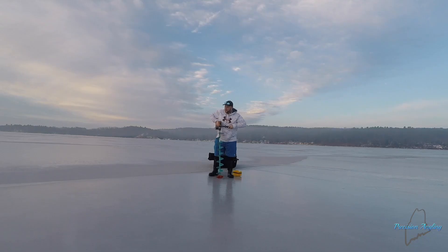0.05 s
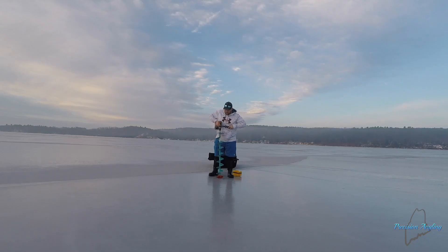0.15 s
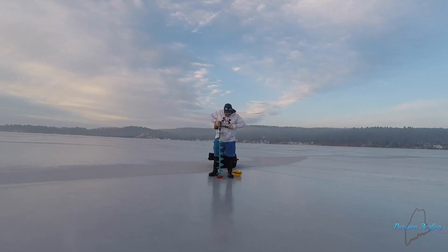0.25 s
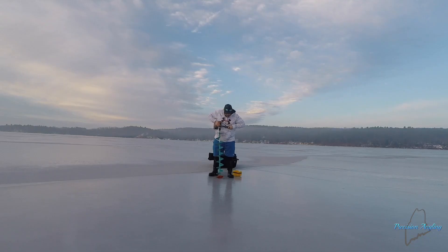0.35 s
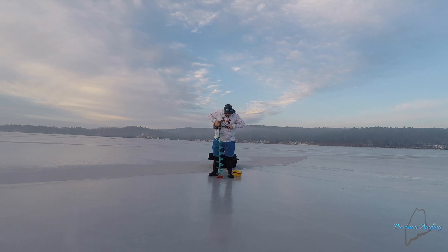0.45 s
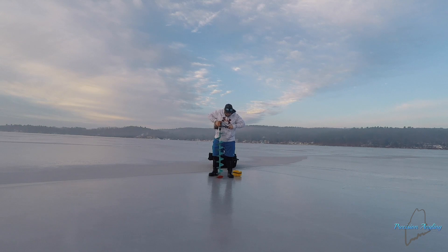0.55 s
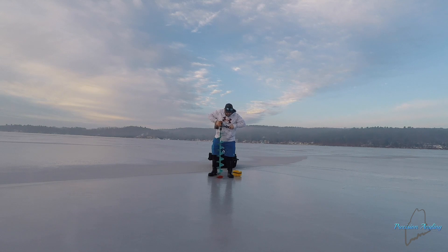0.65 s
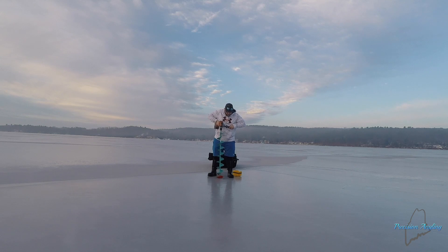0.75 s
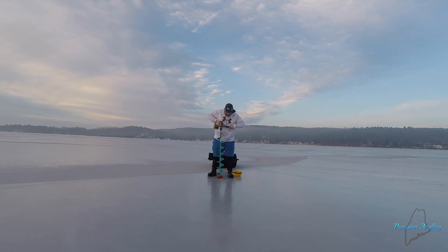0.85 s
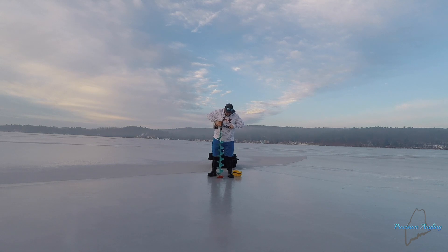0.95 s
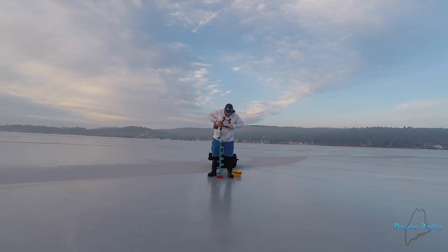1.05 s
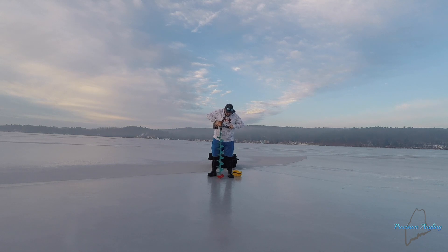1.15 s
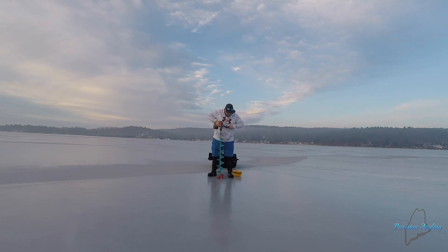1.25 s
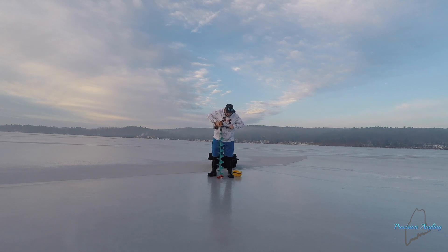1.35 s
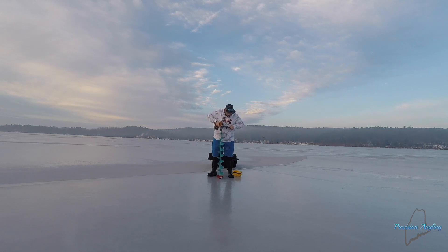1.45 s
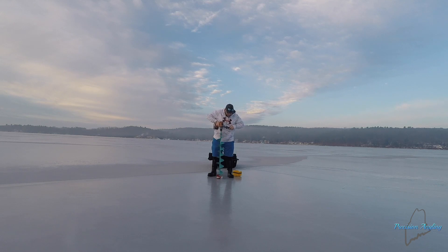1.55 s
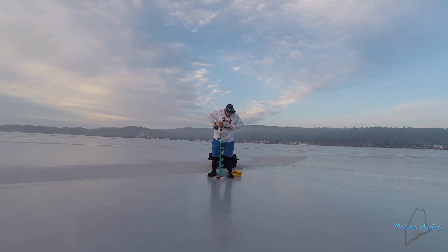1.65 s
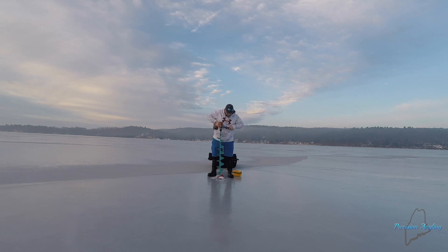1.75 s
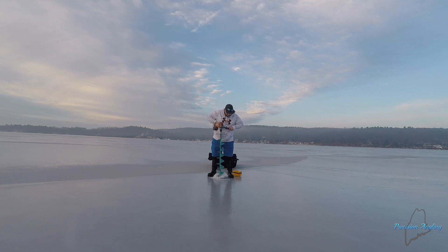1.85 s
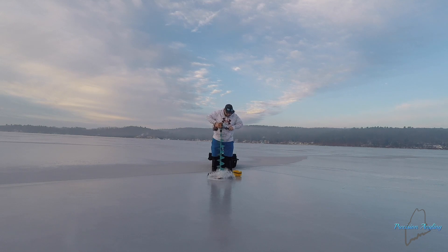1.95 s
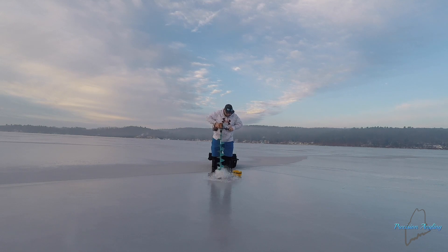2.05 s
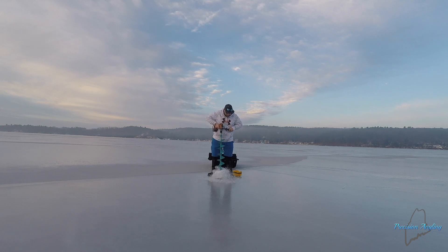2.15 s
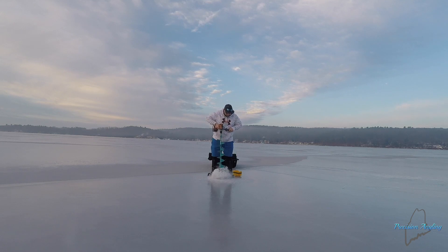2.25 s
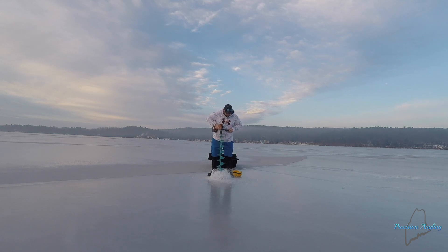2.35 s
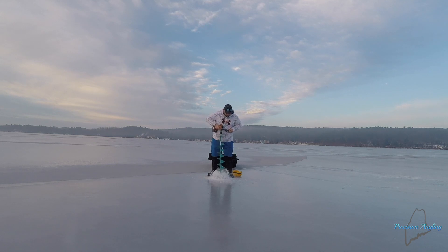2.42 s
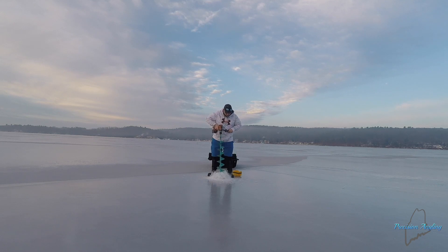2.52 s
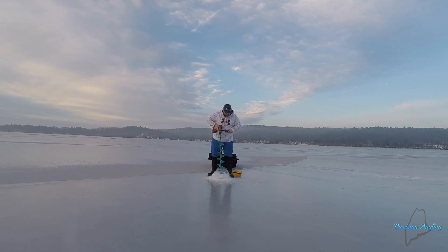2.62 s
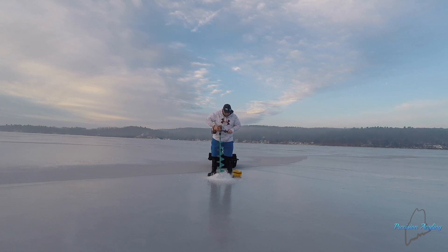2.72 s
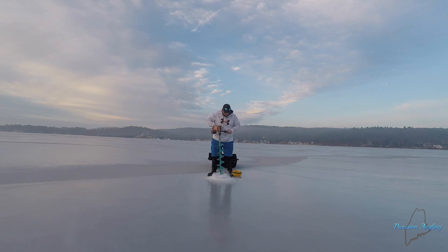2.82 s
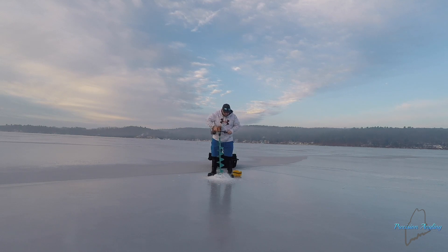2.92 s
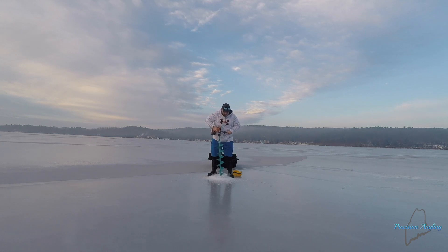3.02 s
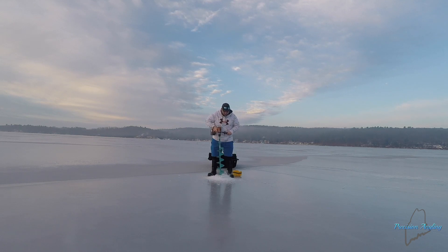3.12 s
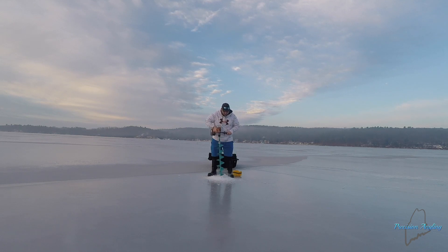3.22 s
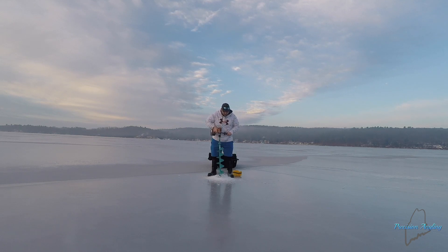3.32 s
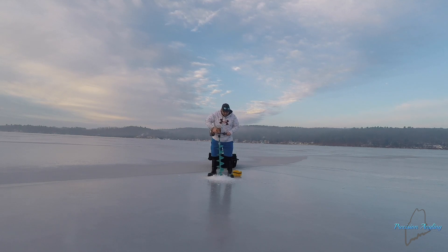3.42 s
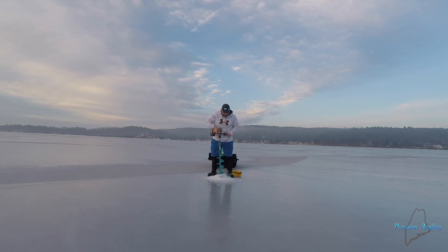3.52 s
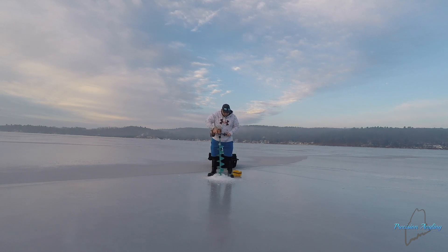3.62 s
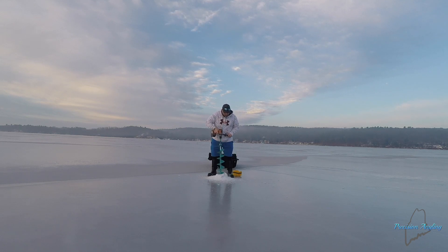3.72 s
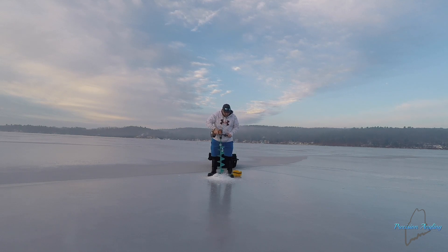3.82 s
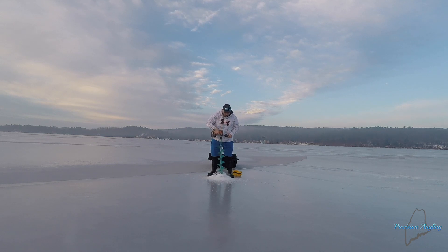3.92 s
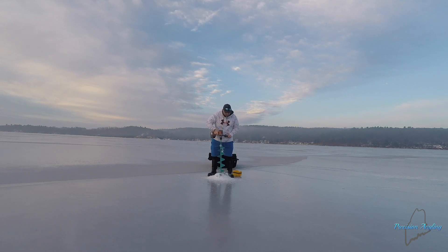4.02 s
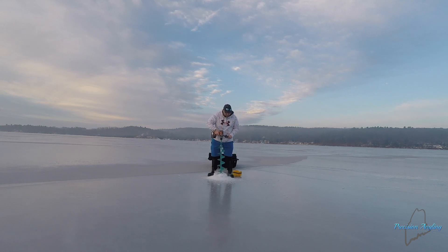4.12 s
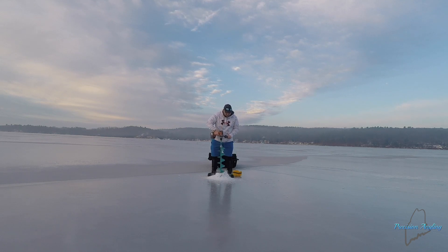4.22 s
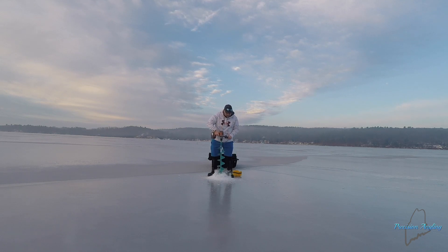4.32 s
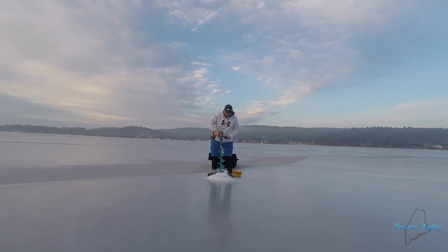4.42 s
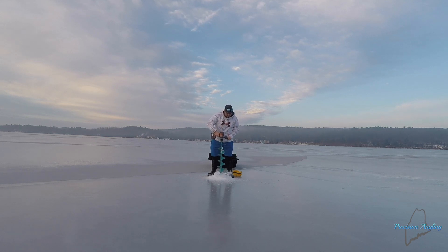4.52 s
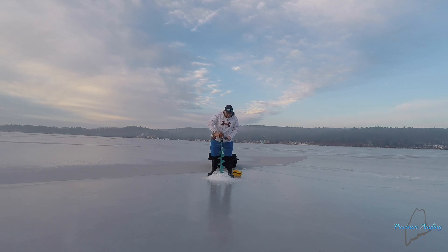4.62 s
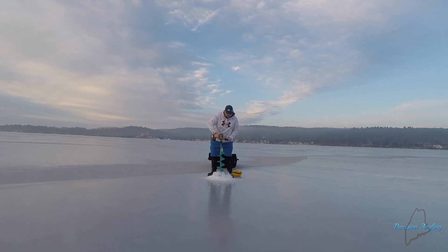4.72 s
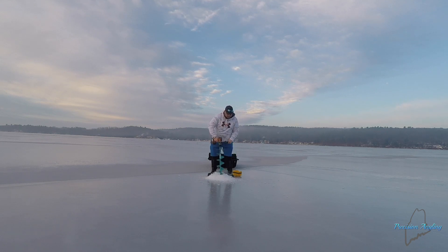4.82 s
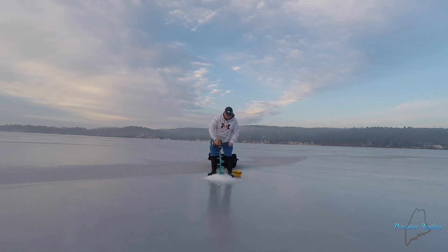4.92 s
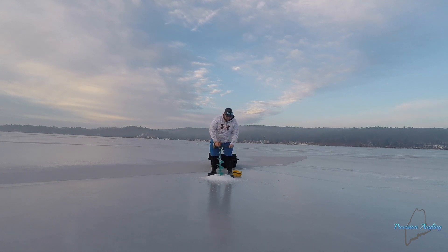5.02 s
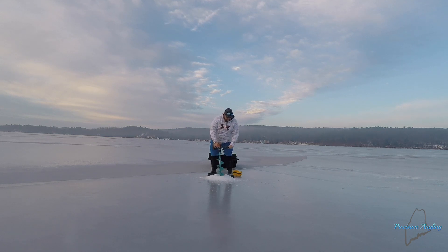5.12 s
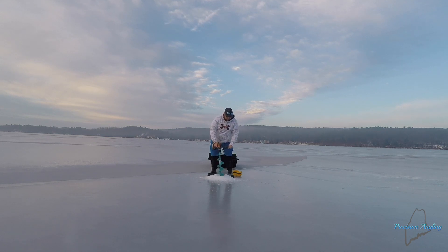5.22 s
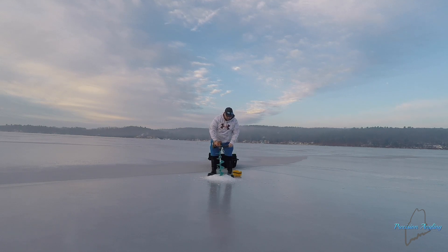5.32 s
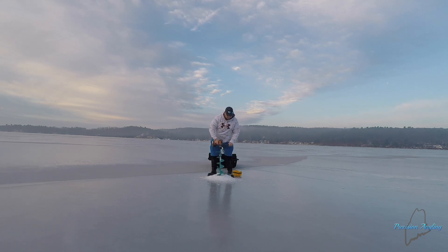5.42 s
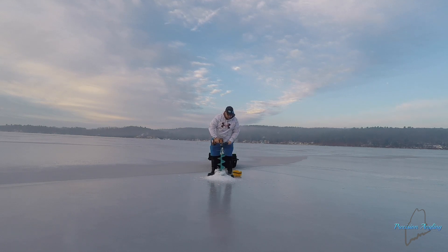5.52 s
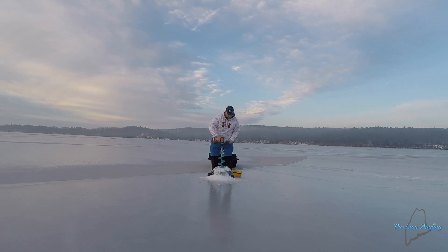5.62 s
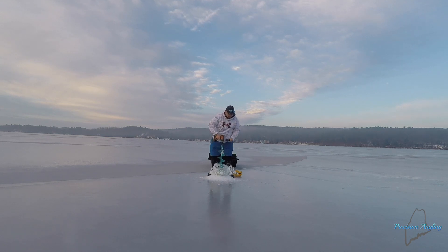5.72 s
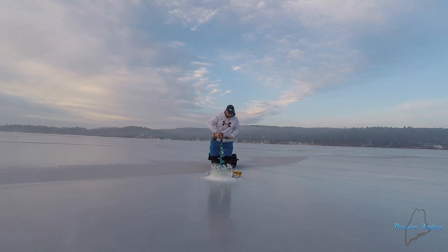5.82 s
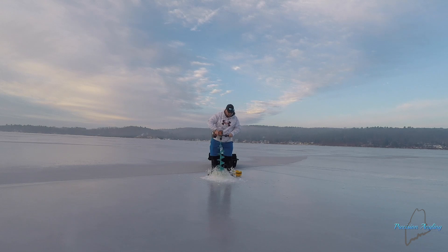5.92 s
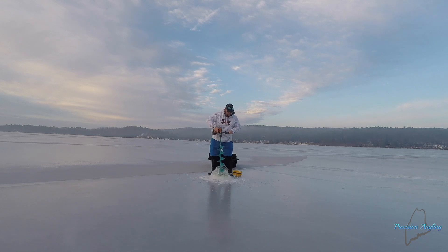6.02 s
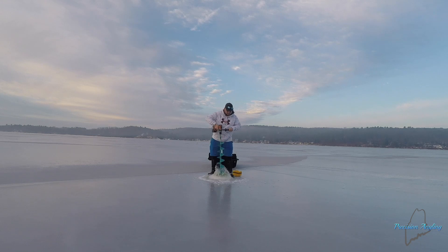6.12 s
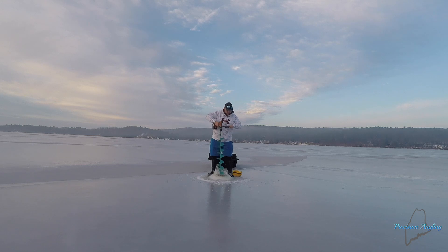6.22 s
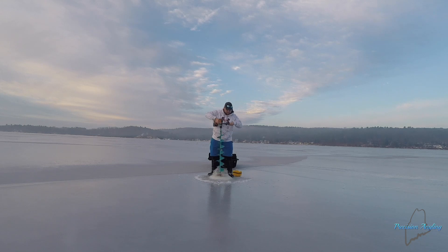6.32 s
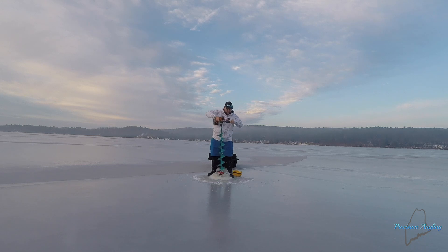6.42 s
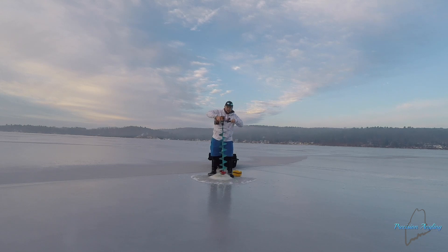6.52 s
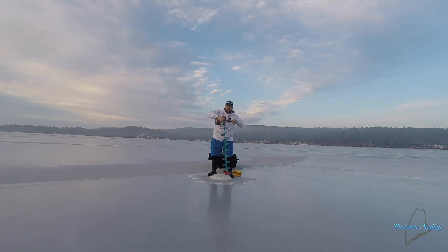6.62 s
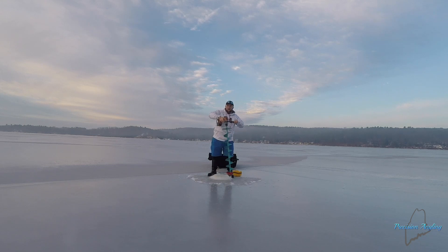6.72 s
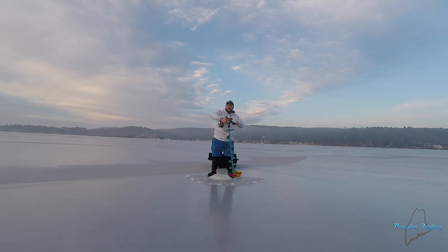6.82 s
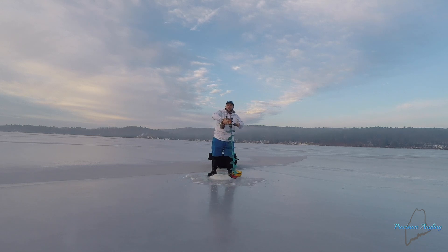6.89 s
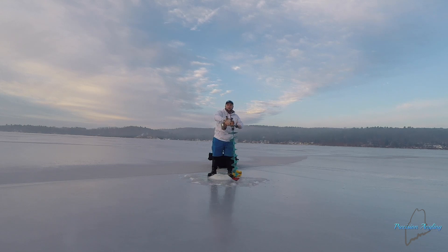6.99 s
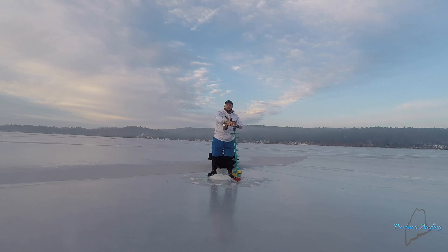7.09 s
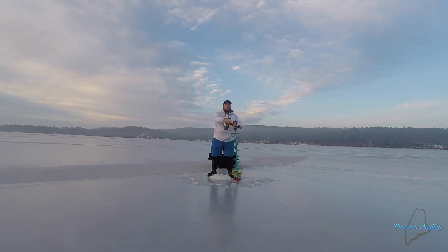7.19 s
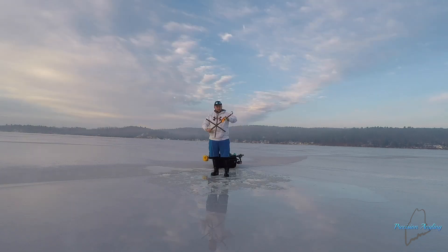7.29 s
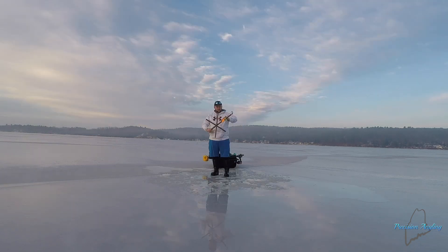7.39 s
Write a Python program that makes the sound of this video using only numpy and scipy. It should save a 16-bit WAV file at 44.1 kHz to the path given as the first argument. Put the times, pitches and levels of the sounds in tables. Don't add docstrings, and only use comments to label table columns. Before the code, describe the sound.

A motorized auger bores through lake ice outdoors, a few metres from one microphone feeding only the right channel, with hiss on the left. Faint crunchy ticks lead to rasping blades, then dense grinding with irregular harsh crunches and a hollow tone sinking as the hole deepens. Water breaks in, the freed motor races and snaps to a stop. It spins up again amid bubbles and slosh, winds down, drips, and a final steel clack follows.

```python
import sys
import numpy as np
from scipy import signal
from scipy.fft import rfft, irfft, next_fast_len
from scipy.io import wavfile
from scipy.ndimage import uniform_filter1d, map_coordinates

SR = 44100
rng = np.random.default_rng(int(sys.argv[2]) if len(sys.argv) > 2 else 0)


def unload_audio(sound):
    columns = np.transpose(np.atleast_2d(sound))
    steps = np.round(np.clip(columns, -1, 1) * 32767)
    wavfile.write(sys.argv[1], SR, steps.astype(np.int16))


def attenuation_scalar(level_db):
    decades = np.asarray(level_db, float) / 20
    return 10 ** decades


N = 328584
T = np.arange(N) / SR

# f/Hz, level/dB per Hz
MURMUR_COLOUR = [(12, -4), (20, -8), (135, -15), (159, -11), (304, -9.5), (514, -16), (579, -10.5),
                 (637, -16), (700, -15.5), (1720, -31.5), (1900, -37), (2400, -43), (6000, -58),
                 (7800, -68), (13200, -120)]
# t/s, length/s, level/dB, f/Hz, width/Hz
SKIDS = [(1.365, .06, -36, 7000, 1500), (1.63, .08, -35, 7100, 1000), (1.11, .13, -52, 7000, 1400),
         (1.03, .15, -55, 2800, 300), (1.03, .25, -61, 4450, 220), (1.4, .06, -43, 5800, 400),
         (4.24, .1, -39, 770, 45), (4.91, .08, -42, 1400, 150), (5.035, .006, -30, 4500, 3500),
         (5.08, .28, -69, 2480, 40), (5.1, .25, -68, 1880, 50), (5.225, .006, -53, 2300, 1200),
         (5.243, .006, -43, 1900, 900), (5.428, .075, -41, 2650, 500), (5.502, .014, -47, 5650, 250),
         (5.243, .005, -58, 10000, 5000), (1.55, .2, -38, 2100, 130), (1.3, .5, -53, 4450, 150),
         (1.03, .3, -52, 2000, 150), (4.962, .012, -26, 4100, 150), (4.962, .01, -27, 5500, 400),
         (5.04, .16, -65, 8050, 350), (5.04, .16, -70, 6700, 180), (5.04, .16, -70, 6000, 180),
         (5.04, .16, -68, 4400, 200), (5.155, .02, -62, 4000, 1200), (2.05, .2, -40, 2950, 90),
         (.715, .012, -72, 4700, 1200), (.765, .012, -69, 4200, 900), (.2, .03, -56, 150, 90),
         (5.04, .065, -53, 5000, 4000), (4.9, .04, -41, 1250, 250), (6.495, .025, -44, 1950, 120),
         (6.492, .03, -45, 1300, 250), (3.95, .75, -49, 165, 25), (6.4, .88, -64, 11500, 4000)]
# t/s, peak level/dB, t60/s
TICKS = [(0.2064, -53, 0.016), (0.2658, -52, 0.012), (0.438, -35.5, 0.0084), (0.474, -43, 0.0058),
         (0.6315, -57, 0.012), (0.6734, -51, 0.015), (0.756, -49, 0.012), (0.8, -51, 0.015),
         (0.9033, -48, 0.012), (0.9138, -38, 0.012), (1.0011, -46, 0.012)]
# t/s, peak level/dB, t60/s
CLACKS = [(1.0345, -31, 0.02), (4.9611, 0, 0.016), (5.0204, 3, 0.015), (5.0334, -21, 0.012),
          (5.0544, -52, 0.03), (5.4565, -16.5, 0.021), (6.0412, -19, 0.035), (6.3884, -21.5, 0.028),
          (6.4815, -25, 0.028), (7.0963, -12, 0.055), (7.1053, -33, 0.067)]
# f/Hz, level/dB per Hz
CLACK_COLOUR = [(88, -35), (150, 0.5), (846, -11.5), (1050, -1), (1670, -9.5), (1880, 1), (2660, -10),
                (2880, -1), (6760, -10.5), (8380, -6), (9980, -26.5), (13100, -18), (15600, -26)]
# t/s, peak level/dB, t60/s
SPITS = [(5.3368, -39.5, 0.035), (5.8087, -19.5, 0.032), (6.1694, -29, 0.071), (6.9274, -43, 0.03),
         (7.2164, -54, 0.034), (7.2594, -50, 0.03), (7.2964, -49, 0.031), (7.3761, -51, 0.03),
         (7.4061, -52, 0.04), (7.435, -45, 0.035)]

# t/s, air column f/Hz, bite centre f/Hz, blade ring level/dB, throb level/dB
DEPTH = [(1.0, 910, 2110, -23, 2), (1.7, 810, 2190, -20, -0.5), (2.2, 620, 1700, -15, 1),
         (2.8, 480, 1770, 0, 4), (3.3, 358, 1880, -7, 1.5), (3.55, 310, 1840, 6, 4.5),
         (4.0, 216, 1760, 2, -2.5), (4.19, 193, 1770, 0.5, -1), (4.23, 192, 1870, -6, -1),
         (4.32, 183, 1900, 4, 2), (4.37, 177, 1920, 13, -8), (4.45, 177, 1770, -2, -1.5),
         (4.78, 170, 1870, -8, 4)]
# t/s, cutting effort level/dB
EFFORT = [(1.02, -60), (1.04, -50), (1.105, -59), (1.115, -44.5), (1.3, -39), (1.4, -34), (1.5, -35),
          (1.59, -31.5), (1.61, -29), (1.7, -28), (1.725, -30.5), (1.76, -29.5), (1.97, -24.5), (2.3, -27),
          (3.1, -30), (3.3, -31), (3.43, -33.5), (4.0, -30.5), (4.4, -34), (4.78, -33)]
# t/s, level/dB
GRIP = [(1.0, -2), (1.45, 1), (1.75, 2.5), (1.95, -3), (2.15, -2), (2.45, 0.5), (3.0, 0), (3.7, -0.5),
        (4.78, 0)]
# first t/s, last t/s
SINK = (1.83, 2.89)
# first t/s, period/s
HALF_TURN = (2.17, .187)
# t/s, length/s, level/dB, extra crushing level/dB
CRUNCHES = [(1.96, 0.068, -1.5, -8), (2.308, 0.05, 0.5, 1.5), (2.5, 0.028, 0, 2), (2.72, 0.043, -2.5, 1),
            (3.01, 0.022, 1.5, 1.5), (3.148, 0.029, 5, 4), (3.357, 0.042, 8.5, 10), (3.573, 0.032, 4, 7),
            (4.025, 0.033, 2.5, 5), (4.23, 0.067, 3, 2.5), (4.496, 0.054, 2, 3.5)]
# t/s, peak level/dB, jump level/dB
SNAGS = [(1.2222, -28, 1), (1.308, -22, 8.5), (1.3394, -22, 2), (1.3718, -17, 7), (1.3908, -15, 3),
         (1.4187, -15, 8), (1.4545, -16, 8), (1.5409, -18, 4), (1.6038, -11, 4.5), (1.6467, -11, 4),
         (1.6886, -10, 4), (1.7435, -11, 4.5), (1.8572, -10, 4), (1.9156, -10, 0.5), (1.9475, -10, 5.5),
         (1.9799, -9, 0), (2.0204, -10, 2)]
# f/Hz, level/dB per Hz
CRUSH_COLOUR = [(240, -9), (400, 2), (676, 1), (782, 3), (906, 2), (975, 5.5), (1400, -0.5), (1820, -24),
                (3080, -120)]
# f/Hz, level/dB per Hz
SPRAY_COLOUR = [(1880, -13), (3200, 0), (3700, 0), (4430, 0.5), (5020, -2), (5930, -3), (6460, -7),
                (7880, 0), (9300, -14), (13500, -12), (14600, -19), (15300, -54), (15600, -35)]
# f/Hz, level/dB per Hz
SKIM_COLOUR = [(1880, -14.5), (3200, 0), (4040, -9), (4580, 1), (5330, -2.5), (7090, -0.5), (8040, -1.5),
               (9180, -13), (13000, -8.5), (15600, -20)]
# f/Hz, width/Hz, level/dB
BLADE_MODES = [(1990, 50, 7), (4540, 45, -7), (780, 45, -3), (3930, 30, -9), (3270, 40, -9),
               (4280, 30, -10)]
# surface level/dB, gain once enclosed/dB, drift/dB per s, dB per dB of effort
BOOM, CRUSHING, BITE, CHIPS = (-46, 31, -1, -0.57), (-17.5, 11.5, 2, 0.46), (0.69, -0.48, -0.79, 1.31), (-2.5, 0.02, 0.46, 1.3)
# t/s, peak level/dB, f/Hz
CHATTER = [(1.9482, -18, 2002), (2.0231, -31, 1960), (2.0994, -19, 2070), (2.1642, -18, 1950),
           (2.2855, -29, 2090), (2.3423, -13, 1880), (2.4366, -20, 2020), (2.4885, -23, 1910),
           (2.5593, -19, 1964), (2.6885, -15.5, 1860), (2.8257, -14, 2005), (2.8991, -13, 1960),
           (2.9435, -20, 2030), (3.0018, -15, 2010), (3.0851, -21, 1950), (3.2009, -19, 2036),
           (3.2677, -13.5, 2040), (3.4777, -23, 1960), (3.5226, -21, 1970), (3.5755, -16, 2033),
           (3.6494, -22, 1990), (3.7601, -20, 2040), (3.8499, -22, 2010), (3.9377, -19, 2005),
           (4.0544, -28, 1995), (4.1243, -23, 1946), (4.251, -24, 2030), (4.3428, -17, 1997)]
# t/s, peak level/dB, f/Hz
JAMS = [(2.677, -25, 532), (2.755, -22, 551), (2.888, -24, 436), (2.959, -26, 805), (3.05, -28, 864),
        (3.129, -19.5, 663), (3.208, -23, 401), (3.335, -22, 775), (3.578, -16.5, 605), (3.736, -21, 830),
        (3.807, -23, 498), (3.921, -19.5, 751), (4.083, -19.5, 791), (4.217, -23, 609), (4.323, -20.5, 785)]

# t/s, gear mesh f/Hz, strain level/dB
LOADED = [(3.3, 2200, -61), (3.41, 2270, -38), (3.49, 2420, -44), (3.56, 2300, -55), (3.63, 2360, -42),
          (3.75, 2560, -44), (3.82, 2450, -52), (3.92, 2550, -35), (3.98, 2420, -50), (4.05, 2410, -40),
          (4.13, 2570, -35), (4.2, 2480, -39), (4.23, 2550, -39), (4.27, 2440, -41), (4.36, 2490, -41),
          (4.405, 2620, -38), (4.47, 2540, -36), (4.55, 2480, -33), (4.6, 2530, -34), (4.685, 2530, -33)]
# t/s, gear mesh f/Hz, strain level/dB
RACING = [(4.7, 2100, -42), (4.74, 2200, -38), (4.785, 2400, -37), (4.81, 2860, -40), (4.83, 2930, -43),
          (4.856, 3160, -37), (4.868, 3040, -45), (4.878, 3190, -39), (4.896, 3285, -35),
          (4.924, 3030, -38), (4.95, 2700, -45), (4.968, 2470, -39), (4.985, 2300, -40), (5.0, 1950, -41),
          (5.017, 1500, -45), (5.04, 907, -65)]
# t/s, gear mesh f/Hz, strain level/dB
RERUN = [(5.469, 500, -65), (5.5, 930, -43), (5.51, 1030, -36), (5.517, 1150, -29), (5.523, 1350, -40),
         (5.53, 1700, -42), (5.55, 2350, -36), (5.585, 2760, -34), (5.62, 2950, -38), (5.64, 3010, -44),
         (5.66, 3055, -38), (5.705, 3075, -37), (5.728, 3030, -38)]
# t/s, gear mesh f/Hz, strain level/dB
COASTING = [(5.746, 2830, -41), (5.775, 2680, -36), (5.795, 2450, -37), (5.82, 2330, -40),
            (5.832, 2270, -52), (5.86, 2150, -46), (5.9, 1990, -39), (5.94, 1700, -49), (5.98, 1480, -46),
            (6.02, 1330, -50), (6.05, 1250, -39), (6.1, 1110, -62)]
BRAKE = [
    (4.945,),
    (5.045,),
]
GEARS = [.5, 1, 2, 1.275, 1.665, 2.385]
# level/dB, then its change/dB while slowing, under load, under the brake
GEAR_LEVELS = [(5, 0, -8, -4), (0, -2, -2, -11), (-6, -1, -9, -5), (-3, -5, 0, -8), (-3, 3, -3, 2),
               (-2, 0, -9, -7)]
# f/Hz, level/dB
HOUSING = [(1100, -6), (1500, -4), (2050, -2), (2500, 10), (2850, 6.5), (3060, -3), (3300, 2), (3650, 3),
           (3900, 3), (4150, -4), (4600, -3), (5100, -2), (5900, -11), (6600, -2), (7200, 4), (7800, 4)]

# t/s, stirring level/dB
STIR = [(4.76, -28), (4.86, -32.5), (4.91, -32.5), (5.01, -36.5), (5.07, -44), (5.17, -62), (5.37, -56),
        (5.45, -45), (5.52, -32), (5.64, -31), (5.81, -36.5), (6.09, -33.5), (6.22, -36.5), (6.47, -40.5),
        (6.68, -45), (6.84, -61), (7.1, -68), (7.3, -56.5), (7.45, -55.5)]
# first t/s, last t/s, level/dB
ROCKING = [
    (4.76, 5.05, -33.5),
    (5.624, 6.142, -26),
    (7.2, 7.45, -50),
]
# f/Hz, level/dB per Hz
CHURN_COLOUR = [(470, -23.5), (800, -6), (1470, 1.5), (1810, -3), (2780, -8), (3400, -22), (4420, -21),
                (7480, -120)]
# f/Hz, level/dB per Hz
FIZZ_COLOUR = [(1760, -18), (3000, -4), (6360, -9.5), (7460, -10.5), (7670, -5.5), (9960, -22),
               (13200, -16), (14800, -28), (15600, -35.5)]
# t/s, peak level/dB, f/Hz, t60/s
GULPS = [(4.773, -12, 591, 0.054), (4.955, -12.5, 380, 0.032), (5.049, -26.5, 580, 0.036),
         (5.35, -36, 316, 0.071), (5.391, -27.5, 570, 0.058), (5.456, -37.5, 153, 0.14),
         (5.497, -24, 380, 0.038), (5.57, -19.5, 610, 0.042), (5.607, -12.5, 487, 0.077),
         (5.65, -40, 450, 0.05), (5.732, -16.5, 662, 0.08), (5.768, -13, 548, 0.1), (5.809, -18, 242, 0.21),
         (5.838, -32, 383, 0.088), (5.903, -24.5, 285, 0.11), (5.989, -24, 530, 0.059),
         (6.039, -16.5, 329, 0.13), (6.108, -26.5, 600, 0.17), (6.157, -22, 360, 0.2),
         (6.206, -20.5, 470, 0.057), (6.219, -16, 547, 0.053), (6.311, -29.5, 544, 0.095),
         (6.382, -35.5, 491, 0.13), (6.43, -41, 565, 0.14), (6.489, -31.5, 381, 0.12)]
# t/s, peak level/dB, f/Hz, t60/s
COLUMN_GULPS = [(4.767, -15, 188, 0.079), (4.77, -14.5, 967, 0.042), (5.82, -25, 246, 0.14),
                (5.919, -27.5, 283, 0.23), (5.98, -21, 503, 0.18), (6.249, -35.5, 273, 0.32),
                (7.088, -30, 300, 0.041)]
# t/s, peak level/dB, f/Hz, t60/s
DRIP = [(6.7454, -31, 1220, 0.027)]
# t/s, level/dB
SET_DOWN = (7.097, -36)
# f/Hz, level/dB, t60/s
SHAFT_MODES = [(655, -7, .2), (1460, -1, .2), (1950, -5, .22), (2240, 0, .17), (3370, -6, .16),
               (3700, -5, .18)]

# f/Hz, level/dB
LEAK = [(30, -24), (110, -29), (380, -35.5), (1290, -43), (4400, -51), (15000, -58)]
# f/Hz, level/dB per Hz
FLICKER_COLOUR = [(12, -3), (40, 0), (90, -11), (200, -30), (400, -120)]


def unit(x):
    return x / np.sqrt(np.mean(x ** 2) + 1e-20)


def along(points, hz):
    f, v = np.transpose(points)
    return np.interp(np.log(hz + 1), np.log(f + 1), v)


def curves(rows, t=T):
    s, *columns = np.transpose(rows)
    return [np.interp(t, s, column) for column in columns]


def inside(rows):
    return np.clip(np.minimum(T - rows[0][0], rows[-1][0] - T) / 0.018, 0, 1)


def wobble(rate):
    knots = rng.standard_normal(int(N * rate / SR) + 4)
    return map_coordinates(knots, [np.arange(N) * rate / SR])


def filtered(x, response):
    m = next_fast_len(N + SR // 2)
    return irfft(rfft(x, m) * response(np.fft.rfftfreq(m, 1 / SR)), m)[..., :N]


def coloured(x, spectrum):
    return unit(filtered(x, lambda hz: attenuation_scalar(along(spectrum, hz))))


def moving_peak(x, column, q, skirt, patchy_db):
    hz, t, z = signal.stft(x, SR, nperseg=1024)
    u = (hz[:, None] + 1) / curves(DEPTH, t)[column]
    gain = np.abs(u / q / (1 - u * u + 1j * u / q)) ** skirt
    gain = gain / np.sqrt(np.mean(gain ** 2, 0))
    clumps = uniform_filter1d(rng.standard_normal(z.shape), size=6, axis=0)
    clumps = unit(uniform_filter1d(clumps, size=4, axis=1))
    return signal.istft(z * attenuation_scalar(patchy_db * clumps) * gain, SR, nperseg=1024)[1][:N]


def grit(rate, spread_db, smooth):
    size_db = spread_db * np.minimum(rng.exponential(size=N), 3)
    cracks = (rng.random(N) < rate / SR) * attenuation_scalar(size_db) * rng.standard_normal(N)
    return unit(unit(cracks) + smooth * rng.standard_normal(N))


def lake():
    swell_db = 0.5 * wobble(3) + 0.5 * wobble(20)
    return attenuation_scalar(-51 + swell_db) * coloured(rng.standard_normal(N), MURMUR_COLOUR)


def skids():
    out, t = np.zeros(N + 2 * SR), np.arange(SR + SR // 4) / SR
    f = np.fft.rfftfreq(len(t), 1 / SR)
    for s, long, db, hz, width in SKIDS:
        band = np.exp(-((f - hz) / width) ** 2)
        hiss = unit(irfft(rfft(rng.standard_normal(len(t))) * band, len(t)))
        swell = (1 - np.exp(-t / (0.08 * long))) * np.exp(-(t / long) ** 4)
        out[round(s * SR):][:len(t)] += attenuation_scalar(db) * swell * hiss
    return out[:N]


def contacts(table, colour, tail_db, attack):
    out, t = np.zeros(N + SR), np.arange(SR // 4) / SR
    for s, db, *_, t60 in table:
        fall = attenuation_scalar(-60 * t / t60) + attenuation_scalar(tail_db - 60 * t / (4.4 * t60))
        out[round(s * SR):][:len(t)] += attenuation_scalar(db - 6.5) * fall * (1 - np.exp(-t / attack)) ** 2
    return out[:N] * coloured(rng.standard_normal(N), colour)


def blade_response(f):
    return sum(attenuation_scalar(db) * 1j * f * w / (c * c - f * f + 1j * f * w) for c, w, db in BLADE_MODES)


def blades():
    effort_db, = curves(EFFORT)
    _, _, ring_db, throb_db = curves(DEPTH)
    sunk = np.clip((T - SINK[0]) / (SINK[1] - SINK[0]), 0, 1)
    full_db = -30

    def layer_db(db, gain, drift, follow):
        return full_db + follow * (effort_db - full_db) + db + gain * sunk + drift * (T - SINK[1])

    hard_db, coarse_db = sum(np.outer(db, np.exp(-((T - s - long / 2) / long) ** 4)) for s, long, *db in CRUNCHES)
    snag_s = 0.0086
    for s, _, jump in SNAGS:
        hard_db = hard_db + jump * np.exp(-np.abs(T - s) / np.where(T > s, snag_s, snag_s / 5))

    chips = grit(rate=2500, spread_db=3.0, smooth=1.67) * attenuation_scalar(1.03 * wobble(24.87))
    ring = unit(filtered(chips, blade_response)) * attenuation_scalar(ring_db + 2.5 * wobble(35) - 1)
    throb = attenuation_scalar(throb_db * np.cos(2 * np.pi * (T - HALF_TURN[0]) / HALF_TURN[1]))
    bite = unit(moving_peak(chips, column=1, q=1.78, skirt=1.74, patchy_db=2.3)) * throb
    bite = bite + 0.7 * ring * np.sqrt(throb)
    air_column = moving_peak(chips, column=0, q=4.5, skirt=1.2, patchy_db=3.2)
    boom = coloured(air_column, [(30, -50), (90, 2), (150, 21)])
    deep = np.clip((T - 1.7) / 0.74, 0, 1)
    spray = np.sqrt(deep) * coloured(chips, SPRAY_COLOUR)
    spray = spray + np.sqrt(1 - deep) * coloured(chips[::-1], SKIM_COLOUR)

    low = attenuation_scalar(layer_db(*BOOM) - 0.18 * coarse_db) * boom
    low = low + attenuation_scalar(layer_db(*CRUSHING)) * coloured(chips, CRUSH_COLOUR)
    high = attenuation_scalar(layer_db(*BITE) + curves(GRIP)[0]) * bite + attenuation_scalar(layer_db(*CHIPS)) * spray
    cut = inside(EFFORT) * (attenuation_scalar(coarse_db) * low + attenuation_scalar(hard_db) * high)
    return filtered(cut, lambda hz: hz ** 2 / (hz ** 2 + 69 ** 2))


def chatter(table, long, rise, db_under, shake):
    out, t = np.zeros(N + SR), np.arange(SR // 6) / SR
    shaken = 1 + shake * wobble(250)
    for s, db, hz in table:
        at = round((s - 0.004) * SR)
        pitch = hz * (1 + rise * (t - long / 2)) * shaken[at:at + len(t)]
        swell = (1 - np.exp(-t / 0.0026)) * np.exp(-(t / long) ** 2)
        out[at:at + len(t)] += attenuation_scalar(db + db_under) * swell * np.sin(2 * np.pi * np.cumsum(pitch) / SR)
    return out[:N] * attenuation_scalar(2.2 * wobble(120))


def motor():
    whine = 0
    loaded, braked = inside(LOADED), inside(BRAKE)
    for run in (LOADED + RACING, RERUN + COASTING):
        mesh_hz, strain_db = curves(run)
        slowing = -uniform_filter1d(np.gradient(mesh_hz), size=800) * SR / 5000
        slowing = np.clip(slowing, -1, 1)
        mesh_hz = mesh_hz * (1 + 0.004 * wobble(45) + 0.004 * wobble(300) * (1 + 1.6 * loaded))
        for multiple, (db, slowing_db, load_db, brake_db) in zip(GEARS, GEAR_LEVELS):
            tremble_db = 1.6 * wobble(50) - 2.5 + load_db * loaded + brake_db * braked
            housing_db = along(HOUSING, multiple * mesh_hz)
            gain = attenuation_scalar(strain_db + db + slowing_db * slowing + housing_db + tremble_db)
            whine = whine + inside(run) * gain * np.sin(2 * np.pi * multiple * np.cumsum(mesh_hz) / SR)
    return whine


def water():
    stir_db, = curves(STIR)
    speed_khz = curves(RACING + RERUN + COASTING)[0] / 1000
    thrown_db = stir_db - 13.5 + 3.5 * speed_khz
    fizz_db = np.where(T > 6.3, np.maximum(thrown_db, -62), thrown_db)
    fizz_db = fizz_db - 90 * np.maximum(T - 7.05, 0)
    rocking = 0
    for first, last, db in ROCKING:
        rise_db, fall_db = 53 * np.maximum(first - T, 0), 140 * np.maximum(T - last, 0)
        rocking = rocking + attenuation_scalar(db - rise_db - fall_db)
    splash = grit(rate=2500, spread_db=2.6, smooth=1.6) * attenuation_scalar(1.3 * wobble(30))
    slosh = coloured(splash, [(100, -25), (230, -1.0), (400, 10.5), (700, -8.0), (1100, -5), (1500, -29.5)])
    slosh = slosh * attenuation_scalar(0.46 * wobble(27))
    churn = attenuation_scalar(stir_db - 7.0) * coloured(splash, CHURN_COLOUR)
    fizz = attenuation_scalar(fizz_db) * coloured(splash, FIZZ_COLOUR)
    return inside(STIR) * (attenuation_scalar(-13.0) * rocking * slosh + churn + fizz)


def gulps():
    out, t = np.zeros(N + SR), np.arange(SR // 3) / SR
    cluster = [(1, 0.5), (1.3, -9.0), (1.5, -4.5), (1.3, -20.0)]
    for table, sizes in [(GULPS, cluster), (DRIP + COLUMN_GULPS, [(1, 0.67)])]:
        for s, db, hz, t60 in table:
            kin = rng.standard_normal((4, 3))
            for (ratio, low_db), (a, b, c) in zip(sizes, kin):
                companion = ratio != 1
                late = np.maximum(t - 0.0077 * abs(a) * companion, 0)
                pitch = hz * ratio * (1 + 0.0654 * b * companion) * (1 + 2.32 * late)
                swell = (1 - np.exp(-late / 0.0019)) * attenuation_scalar(-60 * (late / t60) ** 1.3)
                tone = swell * np.sin(2 * np.pi * np.cumsum(pitch) / SR)
                out[round(s * SR):][:len(t)] += attenuation_scalar(db + low_db + 1.5 * c - 4.5) * tone
    return out[:N]


def shaft():
    start, level_db = SET_DOWN
    t = np.maximum(T - start, 0)
    return sum(attenuation_scalar(level_db + db - 60 * t / t60) * np.sin(2 * np.pi * hz * t) for hz, db, t60 in SHAFT_MODES)


def scene():
    tick_colour = [(1000, -40), (1900, 18), (3500, 18), (6000, 6.0), (15000, -10)]
    spit_colour = [(2500, 1), (5000, 3.0), (8000, 1.0), (14000, -21.0)]
    slap_colour = [(150, -22.0), (300, 0.0), (600, 0.0), (1100, -10.0), (1700, -19.0), (3000, -44)]
    heard = lake() + skids()
    heard += contacts(TICKS, tick_colour, tail_db=-18.0, attack=0.00062)
    heard += blades()
    heard += contacts(CLACKS, CLACK_COLOUR, tail_db=-20, attack=0.0022)
    heard += chatter(CHATTER, long=0.034, rise=0.6, db_under=-7.5, shake=0.011)
    heard += chatter(JAMS, long=0.037, rise=0.6, db_under=-6, shake=0.067)
    heard += motor() + water() + gulps()
    heard += attenuation_scalar(3.5) * contacts(GULPS, slap_colour, tail_db=-22.0, attack=0.0033)
    heard += contacts(SPITS, spit_colour, tail_db=-11.0, attack=0.0022)
    heard += shaft()
    return np.array([0 * heard, attenuation_scalar(6) * heard])


def band_limit(x):
    return signal.sosfilt(signal.butter(12, 16370, fs=SR, output="sos"), x)


def record(dry):
    right = dry[1] / (1 + np.abs(dry[1] / 0.85) ** 4) ** (1 / 4)
    leak = filtered(right, lambda hz: -1j * attenuation_scalar(along(LEAK, hz)))
    leak = leak + attenuation_scalar(-85) * coloured(rng.standard_normal(N), FLICKER_COLOUR)
    hiss = attenuation_scalar([[-71], [-71.5]]) * rng.standard_normal((2, N))
    both = np.array([leak, right]) + hiss
    mix = filtered(both, lambda hz: hz < 15300)
    return band_limit(mix)


dry = scene()
out = record(dry)
unload_audio(out)
```